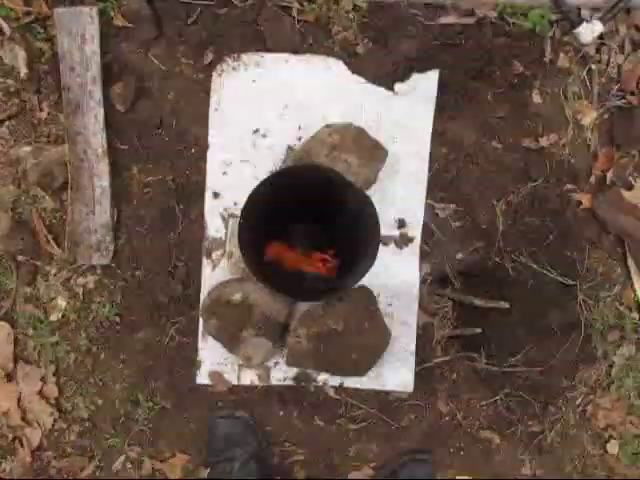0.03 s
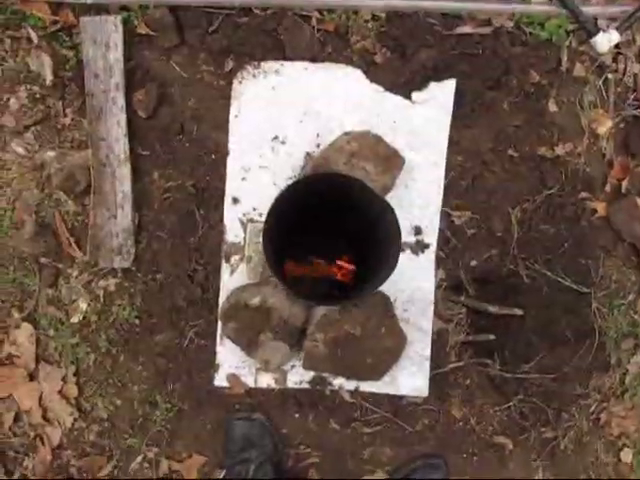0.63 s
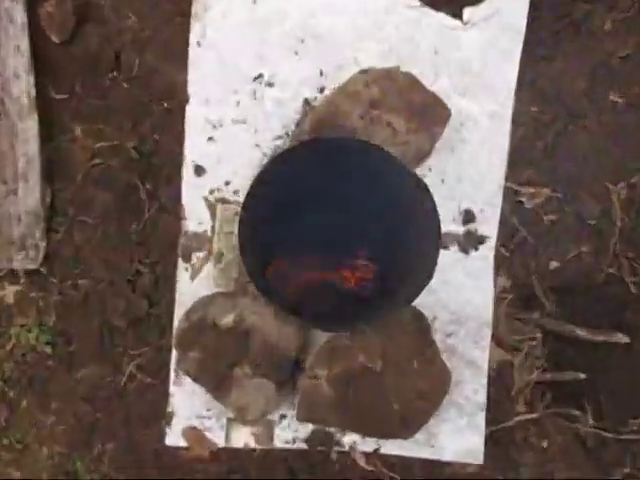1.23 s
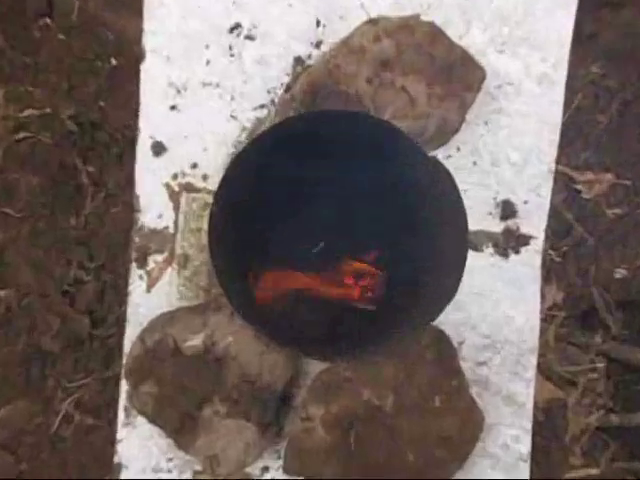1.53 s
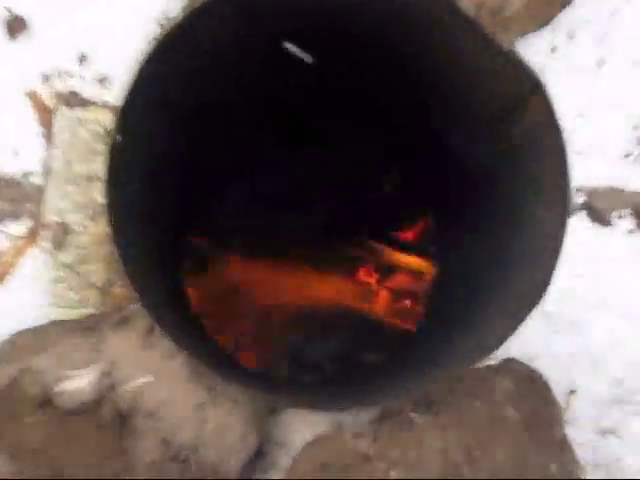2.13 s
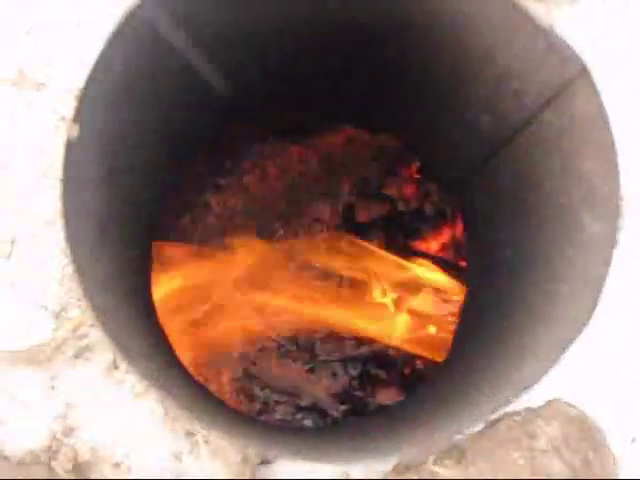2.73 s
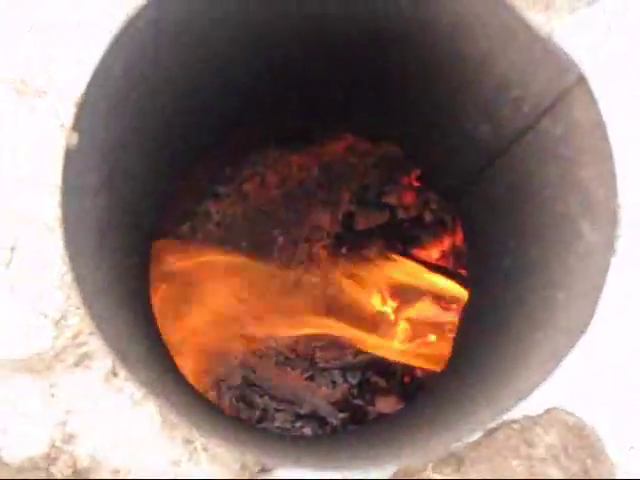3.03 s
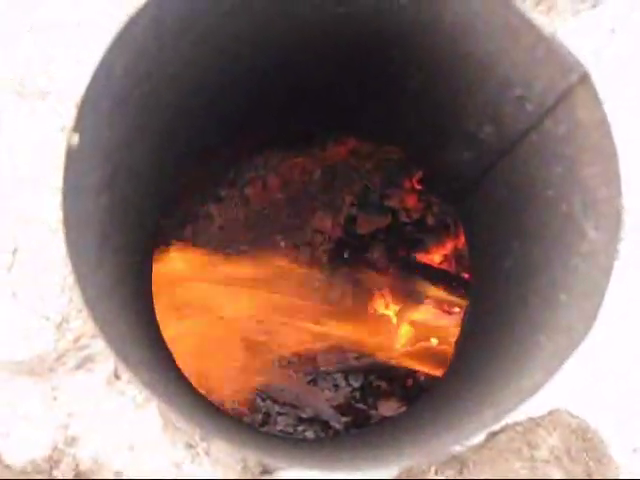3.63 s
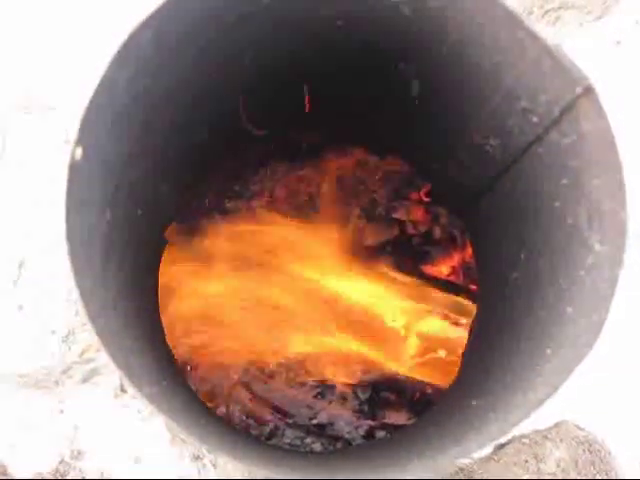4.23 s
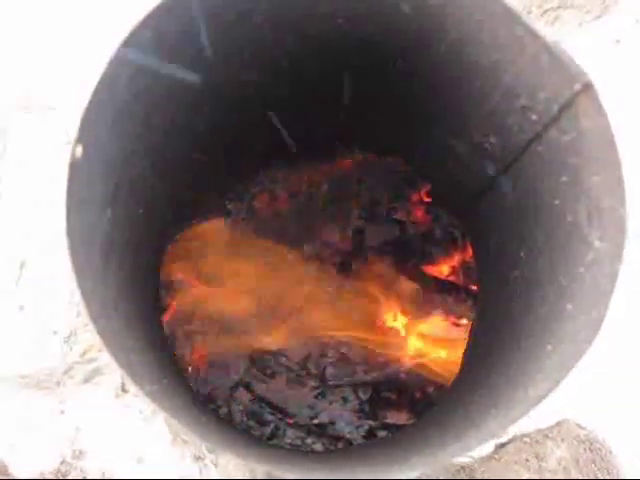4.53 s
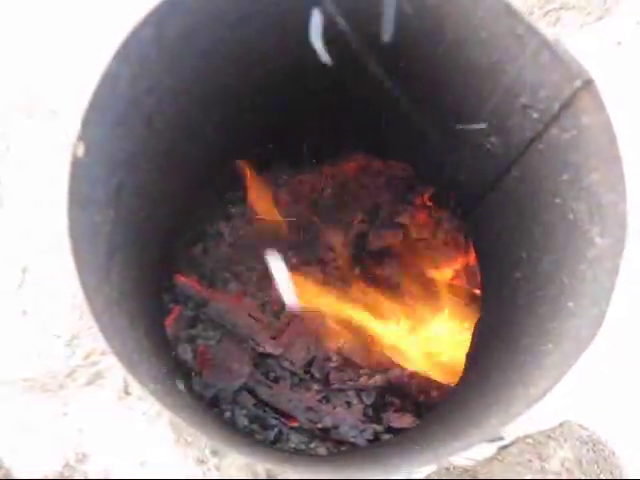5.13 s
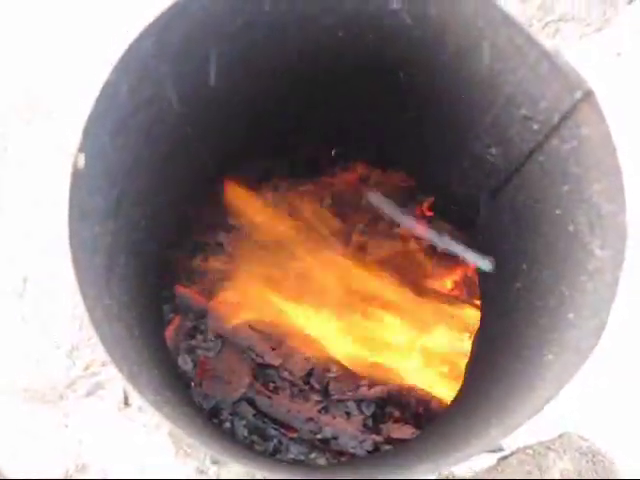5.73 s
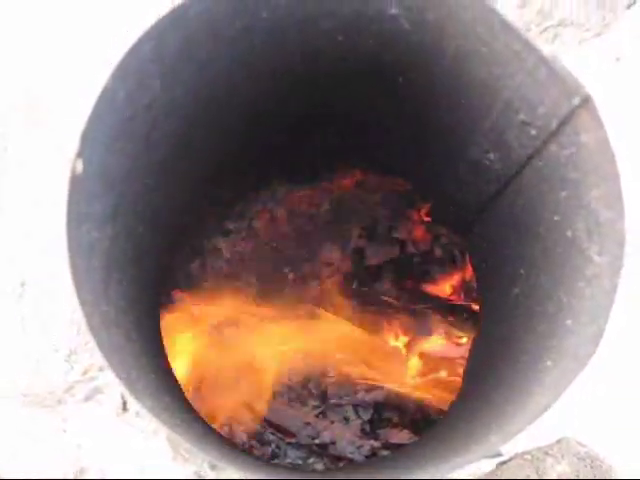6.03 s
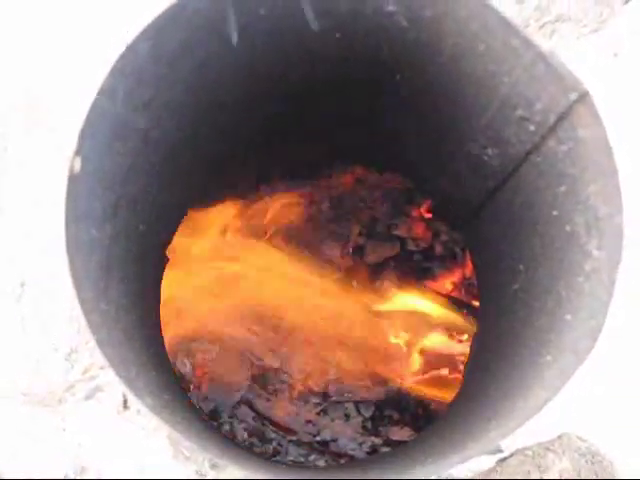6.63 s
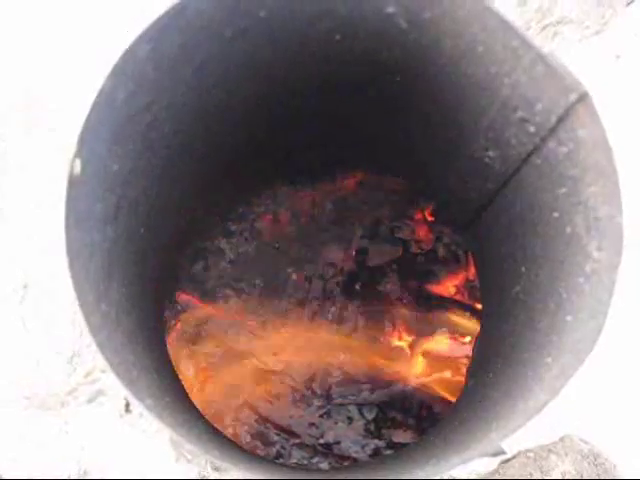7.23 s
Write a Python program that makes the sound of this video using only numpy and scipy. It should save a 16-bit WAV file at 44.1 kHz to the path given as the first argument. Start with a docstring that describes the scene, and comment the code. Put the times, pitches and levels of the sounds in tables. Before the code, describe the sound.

Outdoors, close above a metal stove pipe, flames rush and the draught roars softly while burning wood hisses, crackles and snaps irregularly. At first a thin whistle of gas wavers and dies away; now and then charcoal settles with a gritty clink. Midway, loud low gusts start hitting the stereo microphone, mainly its right side, flapping and thumping over the crackling fire until the end.

```python
"""A rush of flames and a thin whistle of gas come up an upright steel stove pipe, outdoors, close by.
The wood fire below draws hard: the draught roars, sap sizzles, the wood cracks and embers shift.
The stereo microphone leans in over the mouth, and from about halfway the moving air there
buffets and thumps its two ports, mostly the right one."""
import sys
import numpy as np
from scipy import signal
from scipy.fft import rfft, irfft, next_fast_len
from scipy.io import wavfile
from scipy.ndimage import uniform_filter1d, map_coordinates

SR = 44100
rng = np.random.default_rng(int(sys.argv[2]) if len(sys.argv) > 2 else 0)


def put_to_file(sound):
    """Save the sound as 16-bit audio at rate SR, in the file named by the first command-line argument."""
    columns = np.atleast_2d(sound).T  # one column per channel
    safe = np.clip(columns, -1, 1)
    whole_steps = np.round(safe * 32767)
    wavfile.write(sys.argv[1], SR, whole_steps.astype(np.int16))


N = 320607

# how hard the fire burns, before each source's own trim: time_s, flame_db, sizzle_db
FIRE_LEVELS = [(0.0, -46, -47.5), (.28, -45.5, -49), (0.46, -42.5, -47.5), (0.66, -45, -49.5),
               (0.81, -43, -45), (1.05, -43.5, -46), (1.46, -41.5, -47), (1.72, -42, -44.5),
               (1.85, -40, -44.5), (1.92, -42, -43.5), (2.2, -41.5, -42), (2.5, -42.5, -46.5),
               (2.81, -41, -44), (3.1, -41, -42.5), (3.44, -40, -43.5), (3.79, -41, -44), (4.21, -43, -46),
               (4.45, -43, -47), (4.66, -42.5, -44), (4.97, -43.5, -47), (5.47, -43.5, -45),
               (5.83, -43.5, -47), (6.28, -43.5, -46.5), (6.5, -41.5, -45.5), (6.88, -43, -48.5),
               (7.27, -46, -49)]


def flames():
    """The draught roars in the pipe, and the flames flutter above it."""
    # strength of the hollow roar: time_s, level_db
    draught_levels = [(0, -48), (.6, -47), (1.4, -44.5), (2.8, -44), (3.6, -45), (5.5, -45), (7.27, -50.5)]
    # spectrum of the roar: frequency_hz, gain_db
    roar_spectrum = [(25, -10.5), (80, 0.5), (210, -1), (310, 2), (420, 0), (550, -2.5), (750, -3),
                     (1000, -9.5), (1800, -33)]
    # spectrum of the flames: frequency_hz, gain_db
    flame_spectrum = [(300, -4), (700, -2.5), (1150, 1), (1600, 1.5), (2300, 2), (3000, 0.5), (3700, -2),
                      (5000, -13), (9000, -42)]
    flame_db, _ = curves(FIRE_LEVELS)
    flutter = wobble(28)
    roar = amp(curves(draught_levels)[0] + 1.06 * flutter) * rush(roar_spectrum, patchy_db=-0.1)
    return roar + amp(flame_db + 2.0 + .5 * flutter) * rush(flame_spectrum, patchy_db=1.0)


def cracks(trim_db=-6, top_hz=6000, low_hz=2300, glide_s=0.00115, width_hz=2800):
    """A snap comes straight up the pipe; its slanting paths follow as a falling chirp and a scatter."""
    # the loud cracks of the wood: start_s, level_db (before trim), centre_hz, upper_edge_hz
    loud_cracks = [(.4808, -27.5, 5000, 11000), (.4927, -25.5, 5400, 9000), (.6206, -29, 3600, 6000),
                   (.7931, -29, 4800, 8000), (1.0451, -33, 5200, 7000), (1.060, -29, 5600, 12000),
                   (1.1129, -30, 5500, 7500), (1.1205, -34, 10000, 12500), (1.2235, -28, 4600, 6500),
                   (1.2736, -25.5, 3200, 5500), (1.3479, -30, 4200, 10000), (1.3718, -31, 5200, 8000),
                   (1.4981, -27.5, 3700, 6500), (1.6673, -24, 4730, 9000), (1.6791, -17.5, 5400, 11000),
                   (1.7888, -27, 7200, 11500), (2.133, -25, 7000, 11000), (2.192, -27, 4300, 9000),
                   (2.3488, -27.5, 8000, 12500), (2.4564, -30.5, 8600, 12500), (2.4877, -25, 2720, 10000),
                   (2.612, -23, 3390, 8000), (2.787, -25, 4500, 10000), (2.9194, -23.5, 5600, 12500),
                   (3.0061, -23, 5590, 10000), (3.027, -24, 4910, 10000), (3.054, -23.5, 4760, 8500),
                   (3.304, -22.5, 4860, 6500), (3.3953, -17, 5300, 7500), (3.5665, -23, 3260, 5960),
                   (3.716, -21, 5100, 7500), (3.8778, -24.5, 3250, 8000), (3.946, -25, 4100, 7500),
                   (3.972, -23.5, 4700, 10500), (4.1602, -23.5, 2850, 12500), (4.8704, -25.5, 4670, 6460),
                   (4.9947, -26, 4000, 5470), (5.1253, -21, 4800, 11000), (5.1367, -21, 6200, 10000),
                   (5.3885, -25, 3300, 7000), (5.4314, -23.5, 5850, 7500), (5.6206, -26, 2900, 9000),
                   (5.8906, -29.5, 5000, 6500), (5.9345, -25, 2700, 4500), (6.125, -27, 4400, 10000),
                   (6.1326, -30, 7300, 8500), (6.2698, -32, 4500, 7000), (6.3306, -26, 6570, 9000),
                   (6.3635, -24.5, 3680, 8500), (6.379, -29, 4600, 7500), (6.4373, -25, 5200, 9000),
                   (6.446, -30, 4500, 7000), (6.5232, -29, 5500, 8000), (6.5896, -17, 3760, 6450),
                   (6.6104, -27, 4000, 10000), (6.6346, -32, 4440, 11000), (6.9678, -28, 3000, 6000),
                   (7.0908, -26, 5900, 7200), (7.1005, -32, 4800, 6000), (7.1776, -27, 3600, 9000),
                   (7.229, -26.5, 2540, 11000)]
    out, t = np.zeros((2, N)), np.arange(SR // 30) / SR
    for start_s, level_db, centre_hz, edge_hz in list(loud_cracks) + small_cracks():
        fall_s = glide_s * np.exp(0.11 * rng.standard_normal())
        pitch_hz = low_hz + top_hz * np.exp(-t / fall_s)
        phase = 2 * np.pi * np.cumsum(pitch_hz) / SR + rng.normal(0, .7, (2, 1))
        chirp = .4 * np.sin(phase) * amp(-60 * t / .01)
        scatter = rng.standard_normal((2, len(t))) * (amp(-60 * t / .015) + .1 * amp(-60 * t / .05))
        direct = 7.9 * (t == 0)
        band = lambda hz: resonance(hz, centre_hz, width_hz) / np.sqrt(1 + (hz / edge_hz) ** 8)
        snap = filtered(direct + chirp + scatter, band)
        strength = np.sqrt(np.sum(snap.mean(0) ** 2) / (SR // 700))  # rms if packed into 1.4 ms
        add(out, start_s + .0013, amp(level_db + trim_db) * snap / strength)
    return out


def small_cracks(count=26, over_sizzle_db=7.5, spread_db=3, range_hz=(3000, 7000)):
    """Rows for faint cracks at chance moments, stronger when the wood sizzles harder."""
    when, size, tone = rng.random((count, 3)).T
    _, sizzle_db = curves(FIRE_LEVELS)
    level_db = sizzle_db[(when * N).astype(int)] + over_sizzle_db + spread_db * size
    centre_hz = np.interp(tone, [0, 1], range_hz)
    return list(zip(when * N / SR, level_db, centre_hz, 1.2 * centre_hz))


def sizzle():
    """Sap boils out of the wood in a spluttering hiss."""
    # spectrum of the hiss: frequency_hz, gain_db
    hiss_spectrum = [(1500, -27), (3000, -8), (3700, -3), (4400, 1), (5300, 0), (7000, -3.5), (9000, -8.5),
                     (12000, -15), (13000, -26)]
    _, sizzle_db = curves(FIRE_LEVELS)
    splutter_db = 0.79 * wobble(22.15) + 1.12 * wobble(250)
    return amp(sizzle_db + 0.2 + splutter_db) * rush(hiss_spectrum, patchy_db=1.0)


def wind(rumble_db=-4, buffet_db=-0.07, eddy_db=-7.5, stall=0.8, brighten=0.29, lumpy_db=2.5):
    """Each port has its own eddies; a stronger gust breaks large ones into smaller, higher ones."""
    # spectrum of the large eddies: frequency_hz, gain_db
    large = [(12, -28), (30, -8.5), (60, 0), (95, -5.5), (150, -37), (300, -47), (1000, -68)]
    # spectrum of the medium eddies: frequency_hz, gain_db
    medium = [(25, -38), (60, -6.5), (110, 1), (190, -3), (280, -12), (450, -24.5), (900, -34), (3000, -76)]
    # spectrum of the small eddies: frequency_hz, gain_db
    small = [(50, -37), (130, -2.5), (220, 0.5), (320, -3.5), (500, -12), (800, -22), (1400, -31),
             (4000, -55)]
    port_db = gusts()
    force_db = port_db + 32  # 0 in a moderate gust
    lumps_db = lumpy_db * np.array([wobble(110), wobble(110)])
    low, middle, high = (unit(filtered(rng.standard_normal((2, N)), lambda hz: amp(along(band, hz))))
                         for band in (large, medium, small))
    rumble = amp(port_db + rumble_db - stall * np.maximum(force_db, -10)) * low
    buffet = amp(port_db + buffet_db + 0.16 * np.minimum(force_db + 22, 0)) * unit(middle * amp(lumps_db))
    eddies = amp(port_db + eddy_db + brighten * force_db) * unit(high * amp(2 * lumps_db))
    return .6 * np.tanh((rumble + buffet + eddies) / .6)  # rounds off the largest pressure swings


def gusts(rise_share=0.63, fall_share=0.6, edge_db=4.5, steepness=1.9):
    """Buffeting at each port in dB: puffs swell and fall away on top of a steady stream of air."""
    # the stream, strong once the microphone is over the mouth: time_s, level_db
    stream_levels = [(0, -72), (1.5, -63), (2.1, -50.5), (3.25, -51), (3.55, -36), (5.3, -37), (5.7, -38.5),
                     (6.1, -36), (7.27, -34)]
    # puffs breaking over the microphone: crest_s, length_s, level_db, left_minus_right_db
    puffs = [(1.04, 0.042, -31, -6), (1.093, 0.028, -33, 4), (1.188, 0.037, -46, 6),
             (2.086, 0.045, -36.5, -22), (3.23, 0.038, -40, -12), (3.425, 0.07, -27, -27),
             (3.503, 0.038, -20, -10), (3.563, 0.06, -20.5, -3.5), (3.74, 0.055, -25, -20),
             (3.798, 0.053, -22.5, 3), (3.882, 0.047, -23.5, -2.5), (4.024, 0.02, -20.5, -10),
             (4.083, 0.041, -17.5, -6.5), (4.137, 0.026, -26, 3), (4.182, 0.029, -17.5, -17),
             (4.239, .025, -23.5, -15), (4.3, 0.051, -18, -13), (4.408, 0.031, -19, -17),
             (4.476, 0.025, -23.5, -5), (4.534, 0.034, -21.5, -19), (4.631, 0.02, -24, -12),
             (4.659, 0.029, -19.5, 11), (4.706, 0.021, -21.5, -11), (4.756, 0.034, -18, 10.5),
             (4.798, 0.025, -24.5, 5), (4.856, 0.023, -25.5, -7), (4.904, 0.04, -21.5, -7),
             (4.988, 0.035, -20.5, -23), (5.098, 0.024, -22, -18), (5.171, 0.037, -23, 1.5),
             (5.232, 0.027, -26.5, -5), (5.296, 0.025, -25.5, -22), (5.517, 0.045, -32.5, 20),
             (5.583, 0.013, -28.5, 3), (5.619, 0.025, -27.5, -12), (5.771, 0.027, -29, -3.5),
             (5.868, 0.031, -17, -28), (5.926, 0.027, -21.5, -14), (5.994, 0.043, -21, -14),
             (6.07, 0.04, -19, -13), (6.116, 0.016, -20, -22), (6.161, 0.015, -18, -13),
             (6.218, 0.029, -17, -15), (6.31, 0.033, -21.5, -10), (6.378, 0.027, -22, 6),
             (6.44, .036, -26, -18), (6.5, 0.036, -23.5, -9), (6.575, 0.057, -23, -5),
             (6.671, 0.027, -25, 0.5), (6.73, 0.062, -19.5, -13), (6.787, .035, -19.5, -23),
             (6.831, 0.03, -22.5, 1.5), (6.907, 0.023, -18, -21), (6.981, 0.04, -17, -10),
             (7.045, 0.06, -16, -11), (7.116, 0.032, -16.5, -8.5), (7.191, 0.022, -17, -18),
             (7.244, 0.043, -19.5, -16)]
    t = np.arange(N) / SR
    waver_db = 1.5 * np.array([wobble(18), wobble(14)])
    power = (pan(lean_db=-6.5) * amp(curves(stream_levels)[0] + waver_db)) ** 2
    for crest_s, length_s, level_db, lean_db in puffs:
        near = abs(t - crest_s) < 2 * length_s
        from_crest = (t[near] - crest_s) / length_s
        away = np.maximum(-from_crest / rise_share, from_crest / fall_share)
        power[:, near] += (pan(lean_db) * amp(level_db - edge_db * away ** steepness)) ** 2
    return 10 * np.log10(power)


def thumps(trim_db=-4):
    """A vortex crossing a port sucks and then pushes; a quick one sounds like a flap."""
    # single eddies: centre_s, peak_db (before trim), left_minus_right_db, passing_s
    vortices = [(3.511, -10, -18, 0.0012), (4.084, -14, 1, 0.0023), (4.095, -12, -3, 0.0015),
                (4.179, -9, -27, 0.0019), (4.259, -10, -25, .0015), (4.288, -7, -22, 0.0014),
                (4.3, -11, -16, 0.0011), (4.531, -11, -14, 0.0015), (4.746, -8.5, 25, 0.00079),
                (4.758, -3.5, 24, 0.0014), (4.764, -10, 22, .00033), (5.101, -10, -17, 0.0027),
                (5.877, -8, -25, 0.001), (6.073, -5, -21, 0.0012), (6.242, -10, -15, 0.0018),
                (6.698, -9.5, -26, 0.0005), (6.725, -6, -19, 0.0013), (6.774, -7.5, -26, 0.0012),
                (6.793, -9, -27, 0.00049), (6.818, -3.5, -28, .0013), (6.956, -7, -28, 0.0011),
                (7.09, -4, -22, 0.0013), (7.121, -4, -7, 0.0013), (7.182, -13, -20, 0.0012),
                (7.196, -11, -23, 0.0016), (7.236, -11, -12, 0.00059)]
    out, t = np.zeros((2, N)), np.arange(-SR // 100, SR // 100) / SR
    for centre_s, peak_db, lean_db, passing_s in vortices:
        position = t / passing_s
        pressure = position / (1 + position ** 2) ** 2
        add(out, centre_s + t[0], amp(peak_db + trim_db) * pan(lean_db) * pressure / pressure.max())
    return out


def embers():
    """Charcoal settles with a dull, gritty clink that rings across the pipe; a narrow ring pops."""
    # embers shifting: start_s, level_db, ring_hz, width_hz, t60_s, side_share
    shifts = [(0.486, -37, 2620, 750, 0.061, 0.1), (.50, -34.5, 950, 750, 0.06, 0.55),
              (1.274, -30, 2300, 750, 0.022, 0.7), (1.681, -28, 1830, 750, 0.019, 0.2),
              (2.41, -33, 950, 750, 0.05, 0.66), (2.49, -28, 2050, 600, 0.036, 0.4),
              (2.566, -27, 900, 600, 0.042, 0.55), (2.673, -33, 1600, 900, 0.044, .4),
              (2.686, -23.5, 1300, 900, 0.044, 0.43), (2.92, -27, 1350, 1400, 0.018, 0),
              (3.321, -28.5, 1200, 750, .03, 0.5), (4.872, -28, 1300, 750, 0.018, 0.2),
              (5.431, -29, 1580, 160, 0.018, 0.05), (6.969, -26, 1500, 750, 0.019, 0.16)]
    out, t = np.zeros((2, N)), np.arange(SR // 8) / SR
    for start_s, level_db, ring_hz, width_hz, t60_s, side_share in shifts:
        ring = lambda hz: (resonance(hz, ring_hz, width_hz)
                           - 0.16 * resonance(hz, 3.33 * ring_hz, 2 * width_hz))
        fade = amp(-60 * t / t60_s)
        clink = filtered(fade * rng.standard_normal((2, len(t))), ring)
        clink *= np.linalg.norm(fade) / np.linalg.norm(clink, axis=1, keepdims=True)
        mid, side = clink * np.sqrt([[1 - side_share], [side_share]])
        add(out, start_s, amp(level_db) * np.array([mid + side, mid - side]))
    return out


def spurts(splutter_db=5.5, fade_db=5):
    """A pocket of sap opens and fries off in a dense, bright flurry."""
    # pockets of sap: start_s, length_s, level_db
    pockets = [(1.63, .05, -43), (2.88, 0.055, -43.5), (3.94, 0.053, -48), (5.38, 0.046, -43.5),
               (6.267, 0.15, -41.5), (6.588, 0.082, -41.5), (7.1, 0.046, -43.5)]
    envelope, t = np.zeros(N), np.arange(N) / SR
    for start_s, length_s, level_db in pockets:
        age = (t - start_s) / length_s
        envelope += (age > 0) * amp(level_db - fade_db * np.clip(age, 0, 4) ** 3)
    spectrum = [(800, -12), (2500, 5), (5500, 0.5), (10500, -7.5), (13000, -20)]  # frequency_hz, gain_db
    frying = ports(rng.standard_normal((2, N)), spectrum)
    return envelope * unit(frying * amp(splutter_db * wobble(400)))


def crackle(count=1700, spread_db=6, trim_db=-6, smear_t60_s=0.0075, flurry_db=8.5):
    """Tiny bursts in the char come in flurries, each at its own pitch and smeared by the pipe."""
    when, chance, tone = rng.random((count, 3)).T
    sizes = amp(spread_db * np.minimum(-np.log(1 - chance), 3))  # many small, a few large
    t = np.arange(SR // 100) / SR
    grains = rng.standard_normal((count, 2, len(t))) * amp(-60 * t / smear_t60_s)
    centres_hz = 1700 * 7.5 ** tone[:, None, None]
    grains = filtered(grains, lambda hz: resonance(hz, centres_hz, width_hz=centres_hz))
    pair = np.zeros((2, N))
    for start_s, size, grain in zip(when * N / SR, sizes, grains):
        add(pair, start_s, size * grain)
    flurries = amp(flurry_db * np.tanh(wobble(20)))
    # frequency_hz, gain_db
    spectrum = [(400, -10), (1200, 5), (2500, 12), (5000, 6.5), (8000, 5.5), (12000, 2), (13000, -19)]
    _, sizzle_db = curves(FIRE_LEVELS)
    return amp(sizzle_db + trim_db) * ports(pair * flurries, spectrum)


def jet(low_hz=2075, high_hz=2200, width_hz=95, high_db=-2):
    """A breathy whistle of gas from a split in the wood, on two close pitches."""
    # the whistle dies away after the first second: time_s, level_db
    jet_levels = [(0, -52), (.39, -48), (.58, -55), (.7, -49), (.88, -55.5), (1.03, -54), (1.2, -70),
                  (1.6, -78)]
    low, high = (filtered(rng.standard_normal((2, N)), lambda hz: resonance(hz, pitch_hz, width_hz) ** 2)
                 for pitch_hz in (low_hz, high_hz))
    mid, side = low + amp(high_db) * high
    return amp(curves(jet_levels)[0]) * unit(np.array([mid + 0.32 * side, mid - 0.22 * side]))


def slosh(centre_hz=830, width_hz=260):
    """Air sloshes in the first cross mode of the pipe and reaches the two ports in opposite phase."""
    # the mode fades as the microphone comes over the mouth: time_s, level_db
    mode_levels = [(0, -62), (.6, -52.5), (1.6, -50), (2.4, -52), (3, -56), (3.6, -58), (7.27, -61)]
    air = rng.standard_normal(N) * amp(1.7 * wobble(45))
    mode = lambda hz: resonance(hz, centre_hz, width_hz) * resonance(hz, centre_hz, 3 * width_hz)
    return np.outer([1, -1], amp(curves(mode_levels)[0]) * unit(filtered(air, mode)))


def rush(spectrum, patchy_db):
    """Turbulent stereo noise of rms 1, with patches of random gain in time and frequency."""
    noise = signal.stft(rng.standard_normal((2, N)), nperseg=512)[2]
    patches = uniform_filter1d(rng.standard_normal(noise.shape[1:]), size=8, axis=0)
    patches = unit(uniform_filter1d(patches, size=9, axis=1))
    pair = signal.istft(noise * amp(patchy_db * patches))[1][:, :N]
    return ports(pair, spectrum)


def ports(pair, spectrum):
    """Two unrelated signals become the left and right of a sound from the pipe, at rms 1."""
    # how alike the fire is at the two ports: frequency_hz, likeness (1 or more is fully alike)
    likeness = [(750, 2), (950, 0.85), (1400, 0.57), (2000, 0.2), (2700, -0.01), (3600, -0.06),
                (4300, 0.54), (7500, 0.45), (11000, 0.75)]
    # balance of the fire between the ports: frequency_hz, left_minus_right_db
    balance = [(700, 1), (1250, -0.1), (2000, -1.6), (2700, -2.5), (3500, 1), (6000, -0.3)]
    size = next_fast_len(N + SR // 10)
    hz = np.fft.rfftfreq(size, 1 / SR)
    angle = np.arccos(np.clip(along(likeness, hz), -1, 1)) / 2
    mid, side = rfft(pair, size) * np.array([np.cos(angle), np.sin(angle)])
    gain = amp(along(spectrum, hz) + np.outer([.5, -.5], along(balance, hz)))
    return unit(irfft(np.array([mid + side, mid - side]) * gain, size)[:, :N])


def pan(lean_db):
    """Port gains for a left-minus-right level, the stronger at 1."""
    return amp(np.minimum([[lean_db], [-lean_db]], 0))


def amp(db):
    """Decibels to gain."""
    return 10 ** (np.asarray(db) / 20)


def unit(x):
    """Scale to rms 1."""
    return x / np.sqrt(np.mean(x ** 2) + 1e-20)


def along(points, hz):
    """Interpolate (frequency_hz, value) points on a log axis."""
    knots_hz, values = np.transpose(points)
    return np.interp(np.log(hz + 1), np.log(knots_hz + 1), values)


def curves(rows):
    """One value per sample for each column after the time."""
    time_s, *columns = np.transpose(rows)
    return [np.interp(np.arange(N) / SR, time_s, column) for column in columns]


def wobble(rate):
    """A smooth random curve, rate knots a second."""
    knots = rng.standard_normal(int(N * rate / SR) + 4)
    return map_coordinates(knots, [np.arange(N) * rate / SR])


def filtered(x, response):
    """Filter x by a complex response of frequency."""
    n = x.shape[-1]
    size = next_fast_len(n + min(n // 4, SR // 10))
    return irfft(rfft(x, size) * response(np.fft.rfftfreq(size, 1 / SR)), size)[..., :n]


def resonance(hz, centre_hz, width_hz):
    """One damped resonance with a top of 1."""
    return 1j * hz * width_hz / (centre_hz ** 2 - hz ** 2 + 1j * hz * width_hz)


def add(track, start_s, sound):
    """Mix a sound in at start_s."""
    part = track[..., max(round(start_s * SR), 0):][..., :sound.shape[-1]]
    part += sound[..., :part.shape[-1]]


def scene():
    """The fire in its pipe, and the air on the microphone."""
    fire = flames() + slosh() + sizzle() + spurts() + crackle() + jet() + cracks() + embers()
    return fire + wind() + thumps()


def record(dry):
    """The recorder keeps nothing above its band limit."""
    return filtered(dry, lambda hz: hz < 13150)


dry = scene()
out = record(dry)
put_to_file(out)
```